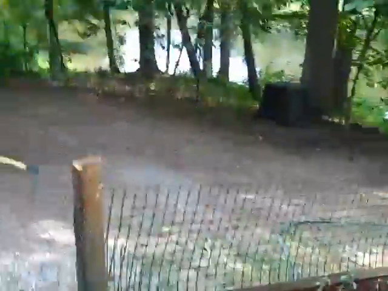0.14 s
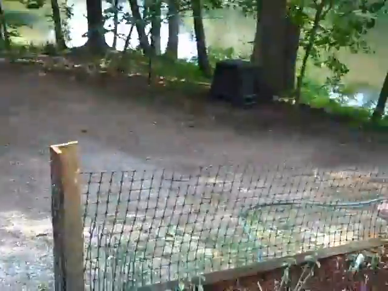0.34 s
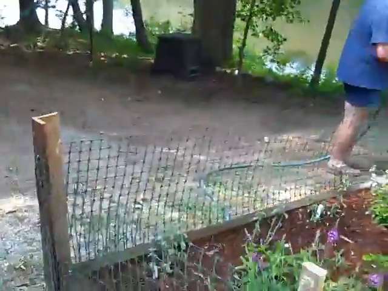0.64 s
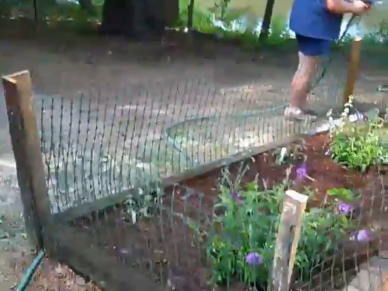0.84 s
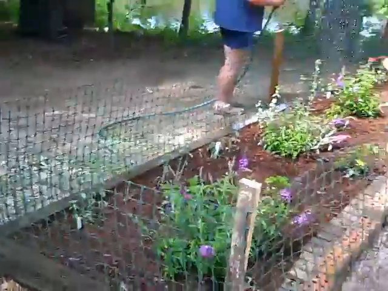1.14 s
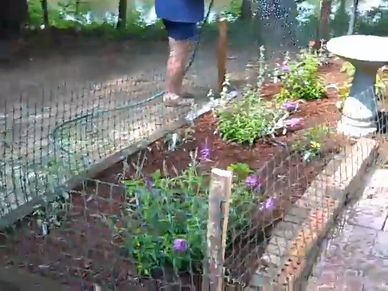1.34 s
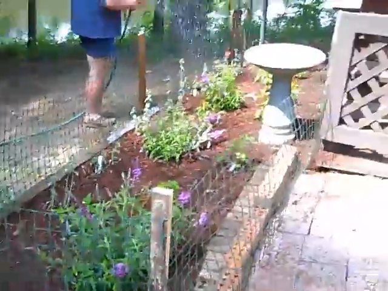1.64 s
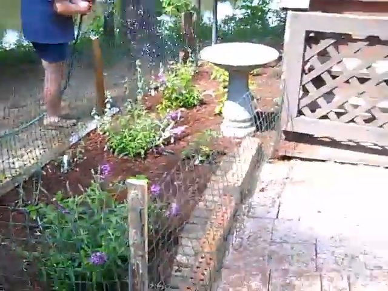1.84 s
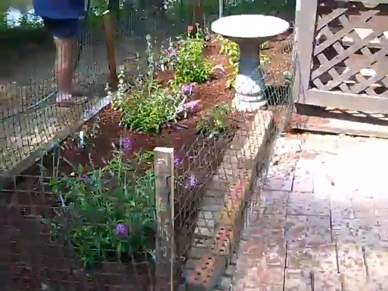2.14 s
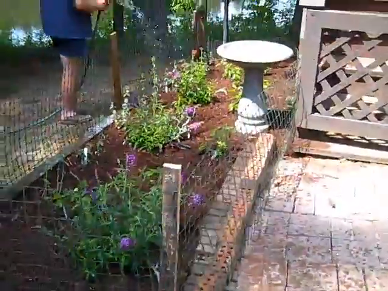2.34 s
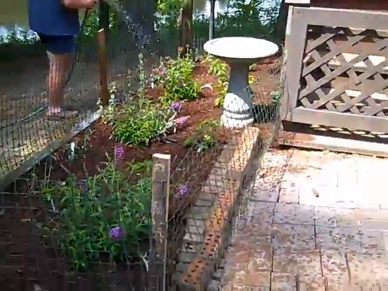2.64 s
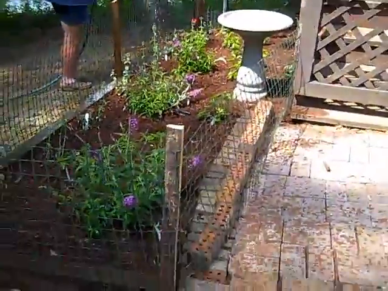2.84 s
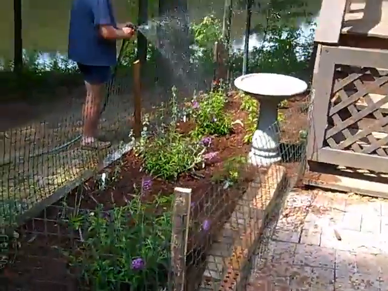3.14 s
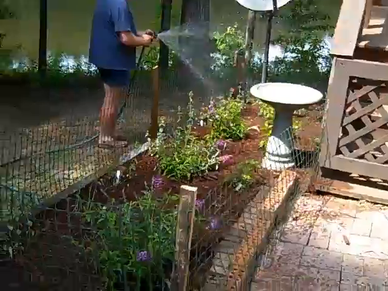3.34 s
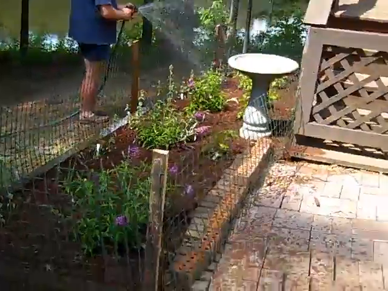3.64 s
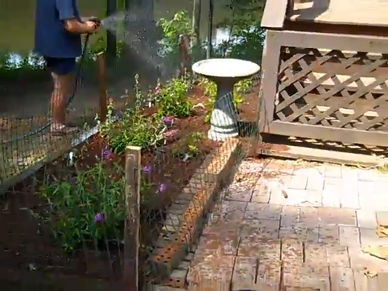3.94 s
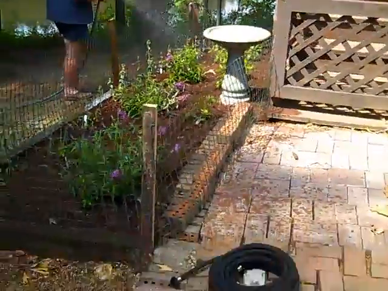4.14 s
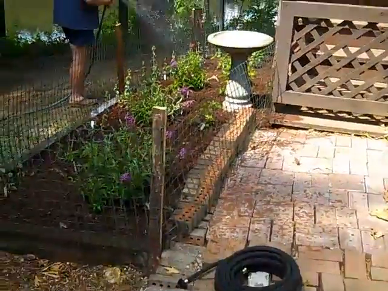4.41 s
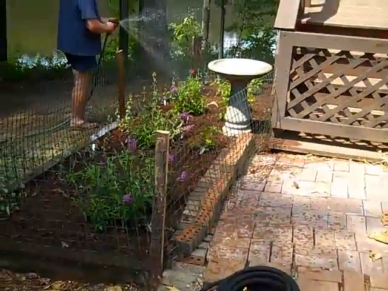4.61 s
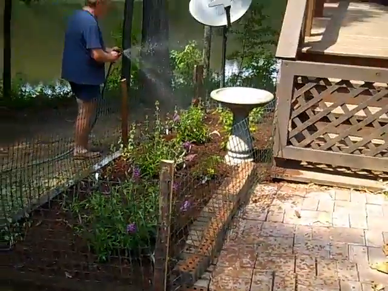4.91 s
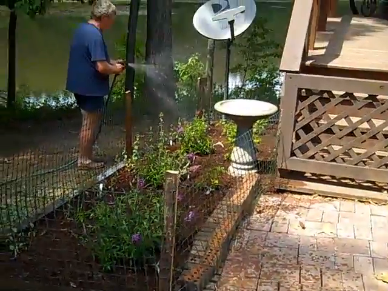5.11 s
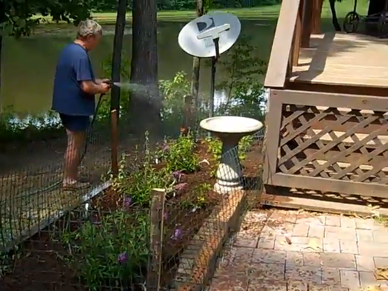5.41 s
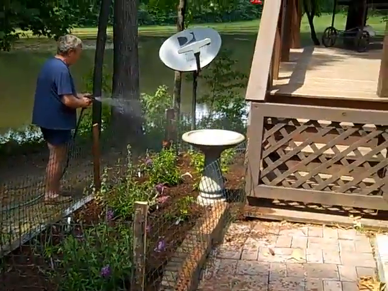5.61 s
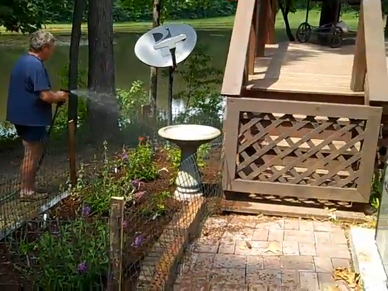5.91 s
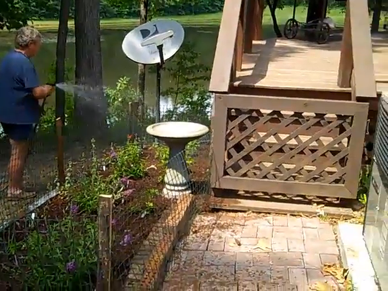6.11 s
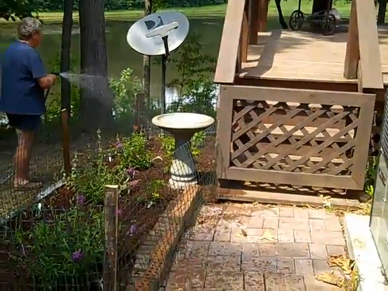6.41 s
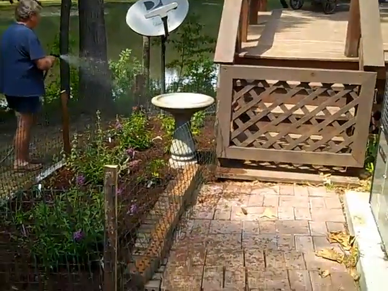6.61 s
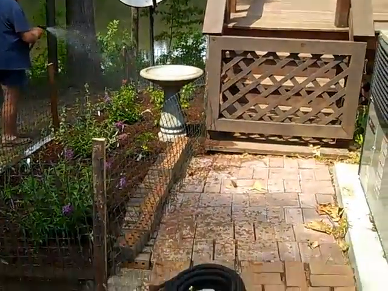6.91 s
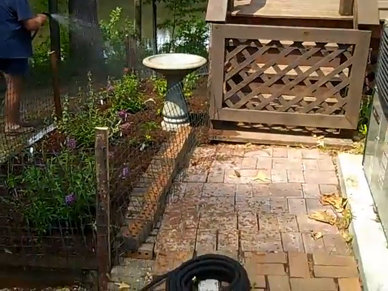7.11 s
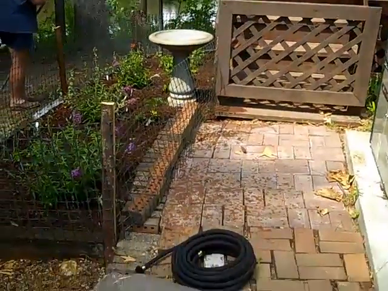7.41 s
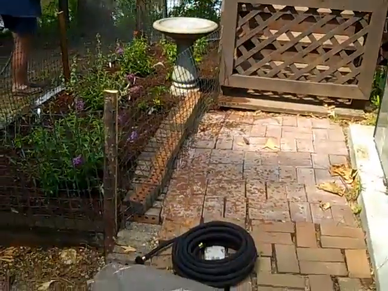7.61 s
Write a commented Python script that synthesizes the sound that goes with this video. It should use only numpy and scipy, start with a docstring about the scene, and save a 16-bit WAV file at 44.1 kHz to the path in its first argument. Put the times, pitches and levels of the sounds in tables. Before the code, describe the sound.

A hose nozzle showers a flower bed a few metres from a hand-held stereo microphone. Small clicks come first, then a loud, gate-like bang with clattering rebounds close on the right. Scuffs and clicks follow; just before three seconds the soft spray jumps to a harder, brighter hiss. Light hollow taps intrude, and near the end the water sizzles on a bush.

```python
"""A flower bed by boards and a wall, a few metres from a hand-held camera: a hose nozzle sprays it.
A soft shower turns into a harder, hissing fan of droplet impacts, which later sizzles on a bush.
Early on something like a gate bangs close by, to the right: noise bursts, thuds and ringing modes.
Clicks, taps, scuffs and bumps come and go over the rumble of open air and a faint far-off hum.
Ground and wall return delayed copies of the hiss; each microphone port resonates at its own pitch."""
import sys
import numpy as np
from scipy import signal
from scipy.fft import rfft, irfft, next_fast_len
from scipy.io import wavfile
from scipy.ndimage import map_coordinates

SR = 44100
rng = np.random.default_rng(int(sys.argv[2]) if len(sys.argv) > 2 else 0)


def unload_audio(sound):
    """Save the sound as a 16-bit wav file, at the path given as the first command line argument."""
    columns = np.transpose(np.atleast_2d(sound))
    # keep every value between -1 and 1, then stretch to whole-number steps
    steps = np.round(np.clip(columns, -1, 1) * 32767)
    wavfile.write(sys.argv[1], SR, steps.astype(np.int16))


N = 341775

# likeness of the two ports for the spray: f/Hz, likeness/0..1
SPRAY_ALIKE = [(300, 0.55), (1000, .85), (2300, 0.71), (4000, 0.36), (6500, 0.083), (14000, 0.17)]
# likeness of the two ports for clicks and scuffs close by: f/Hz, likeness/0..1
NEAR_ALIKE = [(300, 1.0), (2000, 0.74), (8000, 0.074)]


def amp(db):
    """Decibels to gain."""
    return 10 ** (np.asarray(db) / 20)


def unit(x):
    """Scale to rms 1."""
    return x / np.sqrt(np.mean(x ** 2) + 1e-20)


def along(points, hz):
    """Read a curve of (f/Hz, value) points on a log frequency axis."""
    f, value = np.transpose(points)
    return np.interp(np.log(hz + 1), np.log(f + 1), value)


def wobble(rate):
    """A smooth random curve with rate knots a second."""
    knots = rng.standard_normal(int(N * rate / SR) + 4)
    return map_coordinates(knots, [np.arange(N) * rate / SR])


def filtered(x, response):
    """Multiply the spectrum of x by a response of frequency."""
    n = x.shape[-1]
    padded = next_fast_len(n + 4096)
    hz = np.fft.rfftfreq(padded, 1 / SR)
    return irfft(rfft(x, padded) * response(hz), padded)[..., :n]


def spread(pair, spectrum, alike):
    """Two unrelated noises become a coloured, partly alike stereo pair of rms 1."""
    def mid_and_side(hz):
        turn = np.arccos(np.clip(along(alike, hz), -1, 1)) / 2
        return amp(along(spectrum, hz)) * [np.cos(turn), np.sin(turn)]

    mid, side = filtered(pair, mid_and_side)
    return unit(np.array([mid + side, mid - side]))


def bands(x, low_hz=550, high_hz=3800):
    """Split into thud, body and treble, which add up to x again."""
    low = filtered(x, lambda hz: 1 / (1 + (hz / low_hz) ** 4))
    high = filtered(x, lambda hz: 1 - 1 / (1 + (hz / high_hz) ** 6))
    return low, x - low - high, high


def grains(size, rate):
    """Two streams of tiny impacts of unequal strength, rate a second on average, rms 1."""
    hit = rng.random((2, size)) < rate / SR
    strength = amp(2.8 * np.clip(rng.standard_normal((2, size)), -2, 2))
    return unit(hit * rng.standard_normal((2, size)) * strength)


def hollow(x, centre_hz, lift_db):
    """The touched thing favours one pitch; rms 1."""
    def bell(hz):
        octaves = np.log2((hz + 1) / centre_hz)
        return amp(lift_db * np.exp(-.5 * (octaves / .28) ** 2))

    return unit(filtered(x, bell))


def add(track, s, sound):
    """Mix a sound into the track from time s."""
    at = round(s * SR) + np.arange(sound.shape[1])
    inside = (at >= 0) & (at < N)
    track[:, at[inside]] += sound[:, inside]


def spray():
    """Droplets of the jet hiss and drops patter on the bed; ground, wall and deck return copies."""
    hiss_db = hiss_level()
    direct = jet(hiss_db) + mist(hiss_db) + splash(hiss_db)
    return deck(direct + ground_and_wall(direct), share=0.3)


def hiss_level(turn_s=1.2, turned_away_db=-2.5):
    """Drive of the nozzle in dB: jumps as the trigger is squeezed, weaker while the camera faces away."""
    # the nozzle as a soft shower: t/s, level/dB
    shower = [(1.1, -47), (1.884, -48), (2.676, -46), (2.74, -48.5)]
    # the nozzle as a hard fan: t/s, level/dB
    fan = [(2.87, -39.5), (2.99, -42.5), (3.55, -40), (4.85, -41.5), (5.21, -40.5), (5.38, -39.5),
           (5.63, -40.5), (5.94, -41.5), (7.75, -43.5)]
    t = np.arange(N) / SR
    s, db = np.transpose(np.vstack([shower, fan]))
    away = np.clip(1 - t / turn_s, 0, 1)
    return np.interp(t, s, db) + turned_away_db * away


def jet(hiss_db, jet_db=-6.5, flutter_db=0.5):
    """The jet tears into fine droplets, whose dense small impacts hiss."""
    # spectrum of the jet: f/Hz, level/dB
    jet_spectrum = [(1500, -14), (3500, 1), (5000, 5), (8000, 1.5), (11000, -5), (14000, -5.5)]
    drops = spread(grains(N, rate=14000), jet_spectrum, SPRAY_ALIKE)
    return drifting(drops * amp(hiss_db + jet_db + flutter_db * wobble(25)))


def drifting(x, depth_db=0.82, width_hz=600, last_s=0.805):
    """The colour of the hiss drifts slowly, in broad patches of frequency and time."""
    hz, s, z = signal.stft(x, SR, nperseg=512)
    knots = rng.standard_normal((128, 64))
    places = np.meshgrid(hz / width_hz, s / last_s, indexing="ij")
    field = map_coordinates(knots, places, mode="mirror")
    return signal.istft(z * amp(depth_db * field), SR, nperseg=512)[1][:, :N]


def mist(hiss_db, mist_db=-10, power=2.5):
    """The harder the jet, the more of it becomes the finest, brightest droplets."""
    # spectrum of the finest droplets: f/Hz, level/dB
    mist_spectrum = [(4000, -26), (8000, 1), (11000, -7), (14000, 7)]
    force = amp(hiss_db - hiss_db.max())
    drops = spread(grains(N, rate=2700), mist_spectrum, SPRAY_ALIKE)
    return drops * amp(hiss_db.max() + mist_db) * force ** power


def splash(hiss_db, splash_db=-49.5, follows=0.52, patter_db=-12):
    """Water splashes on the bed and sparse heavier drops patter on leaves and mulch."""
    # spectrum of splash and patter: f/Hz, level/dB
    splash_spectrum = [(150, -14.5), (400, -6), (800, 0), (1500, -0.5), (2400, 1), (4000, -0.5), (6000, -4),
                       (9000, -14.5), (14000, -10.5)]
    # follows is dB of splash per dB of hiss
    wet_db = splash_db + follows * (hiss_db - hiss_db.max())
    wash = spread(grains(N, rate=7000), splash_spectrum, SPRAY_ALIKE)
    patter = spread(grains(N, rate=180), splash_spectrum, SPRAY_ALIKE)
    return wash * amp(wet_db + 0.67 * wobble(9.6)) + patter * amp(wet_db + patter_db)


def ground_and_wall(direct, ground_ms=1.13, sway_ms=0.063, wall_ms=0.488):
    """Dull delayed copies comb the hiss, more deeply as the camera moves on."""
    way = np.arange(1, N + 1) / N
    ground, wall = 0.22 * way ** 0.84, 0.35 * way ** 4.4
    dull = filtered(direct, lambda hz: 1 / (1 + (hz / 6000) ** 4))

    def late(ms):
        at = np.arange(N) - ms * SR / 1000
        return np.array([map_coordinates(channel, [at], order=3) for channel in dull])

    # the ground's delay sways with the camera
    return ground * late(ground_ms + sway_ms * wobble(1.48)) + wall * late(wall_ms)


def deck(x, share, count=8):
    """Boards and posts nearby return a few weak copies within 30 ms."""
    delays = rng.uniform(.003, .03, (2, count, 1))
    at = (delays[..., 0] * SR).astype(int)
    signs = rng.choice([-1, 1], (2, count))
    echoes = np.zeros((2, SR // 30))
    np.put_along_axis(echoes, at, signs / np.sqrt(count), axis=1)
    return x + share * signal.fftconvolve(x, echoes, axes=1)[:, :N]


def foliage(leaf_db=-22, bush_s=6.4, reach_s=0.25, bush_db=8.5):
    """Droplets drumming on thin leaves sizzle in a narrow band, more once the fan is on the bush."""
    # spectrum of the leaves: f/Hz, level/dB
    leaf_spectrum = [(2000, -37), (3100, -2), (3700, -2), (4300, -4), (4700, -5), (5400, -30)]
    on_bush = .5 + .5 * np.tanh((np.arange(N) / SR - bush_s) / reach_s)
    sizzle = spread(grains(N, rate=3000), leaf_spectrum, SPRAY_ALIKE)
    return sizzle * amp(hiss_level() + leaf_db + bush_db * on_bush + 0.77 * wobble(11.0))


def gate(thud_t60=0.28, crack_t60=0.015, crack_db=-1.5, clank_db=4.5, chatter_db=2.0,
         lag_ms=0.098, yard_db=-26, yard_t60=0.89):
    """Each contact is a crack and rattling burst, a slower thud, ringing metal and the yard's answer."""
    # contacts: t/s, level/dB, t60/s, clank f/Hz, thud level/dB, treble level/dB
    contacts = [(0.6755, -12.5, 0.1, 1980, -6, -7), (0.684, -18, 0.056, 850, -2, 1),
                (.6995, -22.5, 0.14, 563, 4, 6), (.728, -29, 0.07, 2800, -4, 4),
                (.743, -25, 0.058, 1850, -12, -1), (.7485, -28, .06, 1120, -19, -3),
                (0.8023, -24, 0.12, 2100, -21, -4), (0.8321, -28, 0.11, 1970, -16, 1.5),
                (.928, -47.5, 0.057, 2000, 2, 7), (1.02, -40, 0.093, 1920, -12, 0)]
    # spectrum of the rattle: f/Hz, level/dB
    rattle_spectrum = [(30, -38), (70, -26), (95, -2.5), (150, -1.5), (200, -4), (270, 2.5), (420, 0.5),
                       (680, -6.5), (880, -2), (1100, 2), (1350, 3), (1800, 4.5), (2500, 3.5), (3200, -1.5),
                       (5000, -4), (8000, -9), (14000, -14)]
    # ringing modes of the metal: f/Hz, level/dB, t60/s
    modes = [(168, -17, .33), (431, -17, .18), (505, -12, .16), (707, -14, .14), (969, -14, .14),
             (1135, -14, .18), (1306, -18, .13), (1462, -14, .11), (1867, -19, .22), (2077, -14, .14),
             (2278, -18, .22), (2947, -20, .13), (6056, -42, .8), (9889, -34, 1.35), (10205, -30, .42),
             (11230, -20, .12)]
    rattle_alike = [(200, 1.0), (1400, 0.91), (4000, 0.21), (9000, 0.36)]  # f/Hz, likeness
    out, t = np.zeros((2, N)), np.arange(SR) / SR
    hz, level, life = np.transpose(modes)[:, :, None]
    yard = amp(yard_db - 60 * t / yard_t60)
    crack = amp(crack_db - 60 * t / crack_t60)
    for s, db, t60, clank_hz, thud_db, treble_db in contacts:
        rattle = spread(grains(SR, rate=7700), rattle_spectrum, rattle_alike)
        low, body, high = bands(hollow(rattle, clank_hz, clank_db))
        # loose hardware chatters, so the treble comes in spurts
        chatter = unit(amp(chatter_db * wobble(348)[:SR]))
        burst = (body + amp(treble_db) * chatter * high) * (amp(-60 * t / t60) + yard + crack)
        thud = low * amp(thud_db - 60 * t / thud_t60) * (1 - np.exp(-t / 0.0025))
        # the frame's low modes follow the thud; each port hears each mode a little differently
        uneven_db = rng.standard_normal((2, len(modes), 1))
        strength = amp(level + thud_db * (hz < 800) + uneven_db - 60 * t / life)
        ring = np.sum(strength * np.sin(2 * np.pi * (hz * t + rng.random(hz.shape))), axis=1)
        add(out, s, amp(db) * (burst + thud + ring) * (1 - np.exp(-t / 0.0011)))
    # it stands to the right: the left port hears it later and weaker
    left = filtered(out[0], lambda f: amp(0.5) * np.exp(-2j * np.pi * f * lag_ms / 1000))
    return np.array([left, out[1] * amp(2.35)])


def handling():
    """Small things, a little to the right, that give off almost no deep bass."""
    small = clicks() + taps() + scuffs()
    return filtered(small, lambda f: 1 - 1 / (1 + (f / 110) ** 4)) * amp([[-1], [1]])


def clicks(snap_db=18, tail_db=-17, tail_t60=0.33):
    """Each click is one sharp snap, a quickly dying rattle and a faint tail."""
    # handling clicks and knocks: t/s, level/dB, hollow f/Hz, t60/s, thud level/dB, treble level/dB
    knocks = [(.128, -39, 1490, .015, -5, -10), (.318, -49, 2600, 0.0074, 2.5, -3),
              (0.3366, -47.5, 5000, .006, -6, 0), (1.225, -38, 1900, 0.078, -4, -5),
              (1.243, -41, 1500, 0.027, -3, -10), (1.3495, -49.5, 2980, 0.0058, -5, -2),
              (1.464, -39, 1900, 0.13, -12, -4), (1.772, -45, 780, .003, 1, -13),
              (1.784, -45.5, 2700, 0.086, -2, -5), (2.28, -49.5, 9400, .002, -12, 9),
              (2.884, -42, 7950, 0.0044, 2, 5), (2.936, -37, 1850, 0.044, -1, -16),
              (2.9456, -37.5, 1900, 0.046, 3, -10), (3.0084, -38.5, 2000, 0.049, 0, -10),
              (3.014, -40.5, 1700, .035, 2, -12), (7.311, -45.5, 9000, .008, -6, 3)]
    # spectrum of a click: f/Hz, level/dB
    click_spectrum = [(50, -30), (200, 1), (500, -6.5), (1000, 4.5), (2900, -1), (5000, -1), (14000, -4)]
    out, t = np.zeros((2, N)), np.arange(SR // 4) / SR
    ten_ms = SR // 100
    for s, db, hz, t60, thud_db, treble_db in knocks:
        decay = amp(-60 * t / t60) + amp(tail_db - 60 * t / tail_t60)
        blow = rng.standard_normal((2, len(t))) * decay
        blow[0, 0] = amp(snap_db)
        # a silent lead-in leaves room for what the filters spread ahead of the snap
        blow = np.pad(blow, ((0, 0), (ten_ms, 0)))
        low, body, high = bands(hollow(spread(blow, click_spectrum, NEAR_ALIKE), hz, lift_db=8.5))
        sound = unit(amp(thud_db) * low + body + amp(treble_db) * high)
        # the level counts the click's energy as if it lasted about 10 ms
        add(out, s - ten_ms / SR, sound * amp(db) * np.sqrt(ten_ms / len(t)))
    return out


def taps():
    """Each light tap on something hollow rings a few short modes."""
    # taps: t/s, level/dB, pitch f/Hz
    strokes = [(1.505, -35, 1250), (3.249, -37.5, 1220), (4.621, -33, 1380), (4.6615, -32.5, 1400),
               (4.6685, -35.5, 1480)]
    # modes they ring with: multiple of the pitch, level/dB, t60/s
    tap_modes = [(1, -1, .03), (2.1, -7, .022), (2.6, -11, .022), (4.7, -10, 0.014)]
    out, t = np.zeros((2, N)), np.arange(SR // 8) / SR
    for s, db, hz in strokes:
        for multiple, level, t60 in tap_modes:
            uneven_db = rng.standard_normal((2, 1))
            strength = amp(db + level + uneven_db - 60 * t / t60)
            add(out, s, strength * np.sin(2 * np.pi * hz * multiple * t))
    return out


def scuffs():
    """Shoes and hands scuff: gritty grains swell and fade."""
    # scuffs: t/s at the loudest, level/dB, half length/s, hollow f/Hz, thud level/dB, treble level/dB
    rubs = [(.144, -37, 0.0095, 170, 3.5, -8.5), (0.217, -40.5, 0.0063, 6100, -3, 2.5),
            (1.25, -34.5, 0.013, 1100, -0.5, 0.5), (1.472, -45, 0.011, 6000, -12, 4.5),
            (1.511, -41.5, 0.011, 2500, -15, -8), (2.833, -57.5, 0.02, 4400, -15, 12),
            (2.903, -43, 0.017, 6700, -5, 2), (2.943, -41.5, 0.031, 1000, -6, -6),
            (3.028, -52.5, 0.012, 400, 15, -14), (3.164, -39.5, 0.015, 2620, 0, 0.5),
            (4.155, -51.5, 0.071, 1120, -6, -19), (4.642, -42.5, 0.049, 3080, -17, -8)]
    # spectrum of a scuff: f/Hz, level/dB
    scuff_spectrum = [(50, -9), (150, 4), (400, -0.5), (700, 2), (1200, 1), (2000, 1.5), (3200, 1),
                      (5000, 2.5), (8000, -7), (14000, -24)]
    out, t = np.zeros((2, N)), np.arange(SR // 2) / SR
    middle = t.mean()
    for s, db, half, hz, thud_db, treble_db in rubs:
        grit = spread(grains(len(t), rate=11000), scuff_spectrum, NEAR_ALIKE)
        low, body, high = bands(hollow(grit, hz, lift_db=7))
        swell = 1 / (1 + np.abs((t - middle) / half) ** 3)
        sound = amp(thud_db) * low + body + amp(treble_db) * high
        add(out, s - middle, sound * swell * amp(db))
    return out


def bumps(case_hz=58, t60=0.14):
    """The camera's case answers each soft bump of the hand with a short low thump."""
    # bumps: t/s, level/dB
    knuckles = [(1.62, -53), (2.46, -56), (5.21, -60), (5.3, -62), (7.069, -51)]
    out, t = np.zeros((2, N)), np.arange(SR // 4) / SR
    for s, db in knuckles:
        thump = np.sin(2 * np.pi * case_hz * t) * amp(db - 60 * t / t60)
        add(out, s, np.tile(thump, (2, 1)))
    return out


def outdoors(air_db=-59, hum_db=-70, hum_hz=242):
    """Soft rumble of open air and a faint, slightly wavering far-off hum that fades up."""
    # spectrum of the open air: f/Hz, level/dB
    air_spectrum = [(20, -16), (55, -2), (85, -2.5), (130, 0.5), (250, 1), (420, 1.5), (700, -8),
                    (1500, -14), (5000, -20)]
    air_alike = [(30, 0.17), (150, 0.7), (2000, 0.89)]  # f/Hz, likeness
    air = spread(rng.standard_normal((2, N)), air_spectrum, air_alike) * amp(air_db + wobble(4.62))
    pitch = hum_hz + 2.55 * wobble(9)
    waver = amp(1.5 * wobble(9))
    fade = np.interp(np.arange(N) / SR, [1.8, 3.2], [.3, 1])
    hum = np.sin(2 * np.pi * np.cumsum(pitch) / SR) * waver * fade
    return air + amp(hum_db) * unit(hum)


def scene():
    """Everything that reaches the camera."""
    return spray() + foliage() + gate() + handling() + bumps() + outdoors()


def record(dry, top_hz=14300):
    """Each port adds its resonance; the camera clips at full scale and keeps nothing above top_hz."""
    # colour of the left port: f/Hz, level/dB
    left_port = [(100, 2), (3000, 1.5), (5000, 1.5), (6300, 3.5), (7100, 8.5), (7700, 16), (8250, 18),
                 (9000, 12), (10000, 6), (11500, 2.5), (14000, -3.5)]
    # colour of the right port: f/Hz, level/dB
    right_port = [(100, -0.5), (3000, 2), (5000, 3.5), (5700, 8), (6250, 13.5), (7000, 8), (8000, 5),
                  (9000, -5.5), (10000, 0), (11300, -9), (14000, -14)]
    # phase between the ports: f/Hz, phase/rad
    port_phase = [(100, -1), (5200, 0.84), (6000, -2), (6800, 0.6), (7500, 3), (8350, -2.8), (9300, 1),
                  (14000, 1)]

    def ports(hz):
        colour = amp([along(left_port, hz), along(right_port, hz)])
        return colour * np.exp(.5j * along(port_phase, hz) * [[1], [-1]])

    clipped = np.clip(filtered(dry, ports), -1, 1)
    return filtered(clipped, lambda hz: hz < top_hz)


dry = scene()
out = record(dry)
unload_audio(out)
```